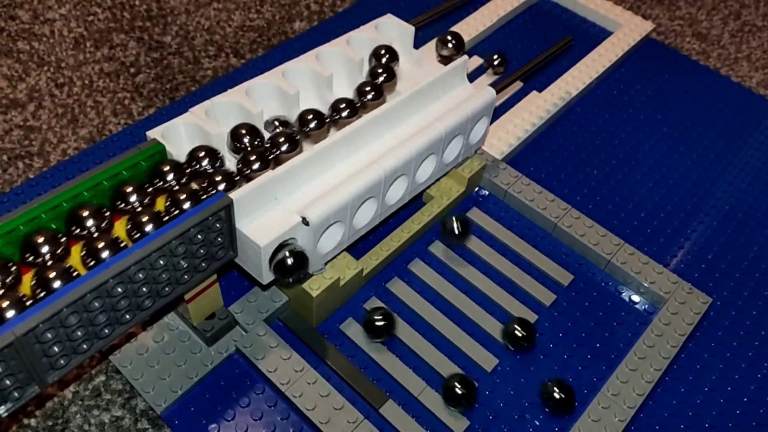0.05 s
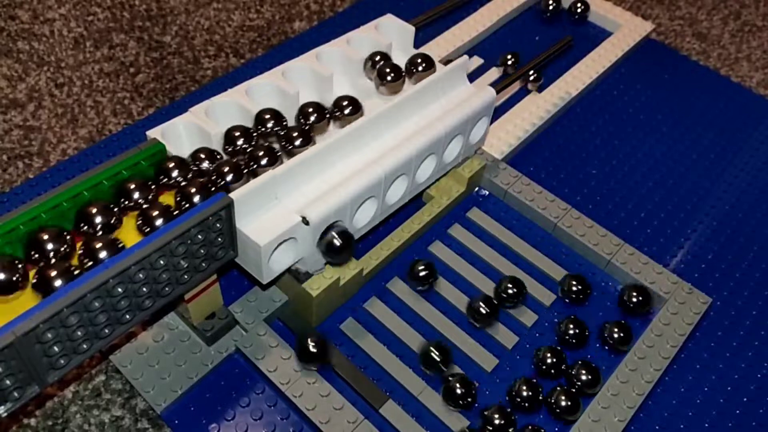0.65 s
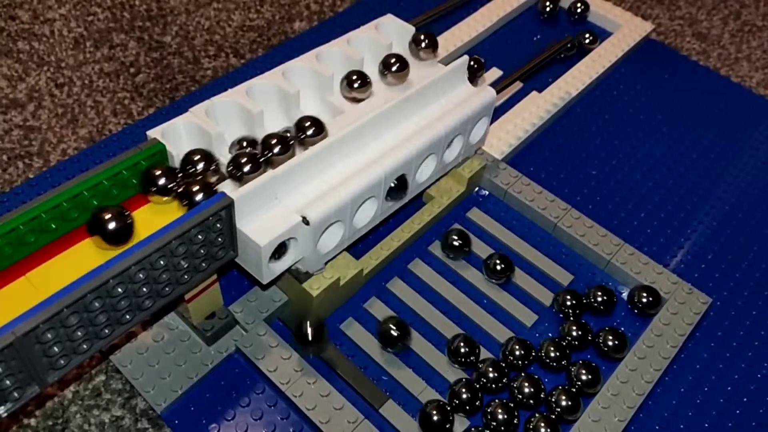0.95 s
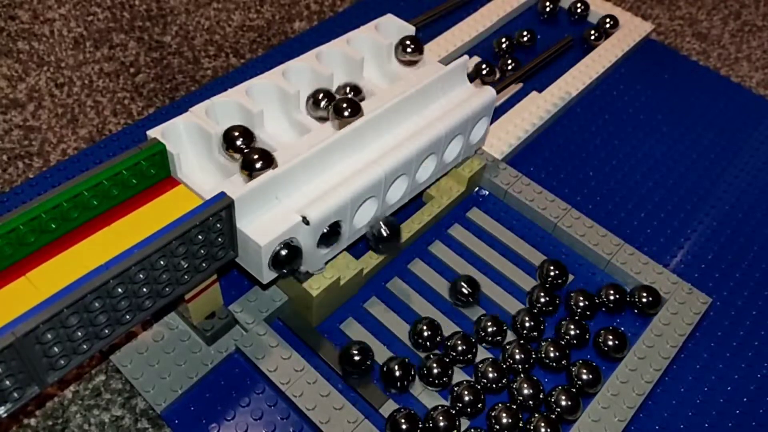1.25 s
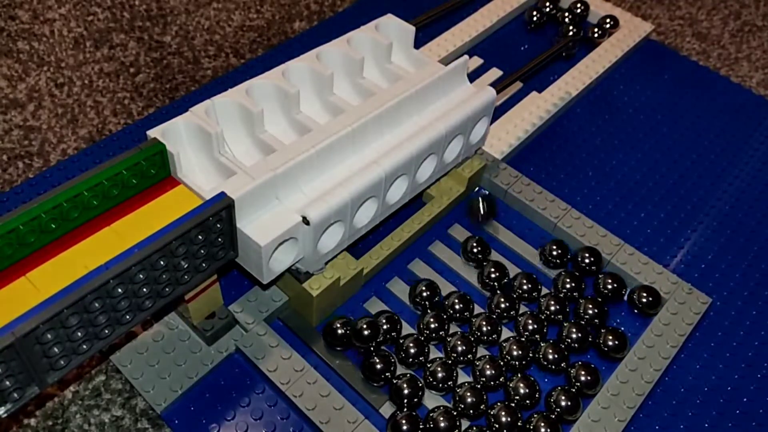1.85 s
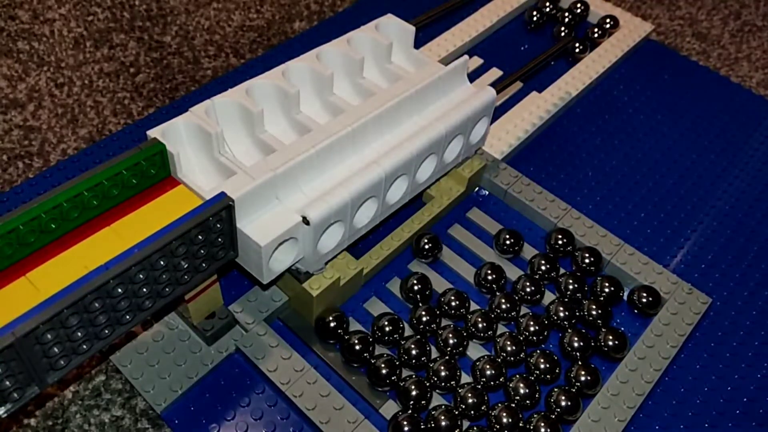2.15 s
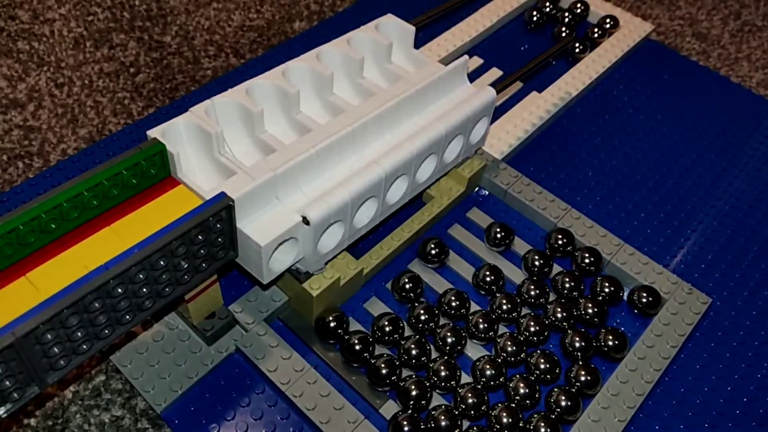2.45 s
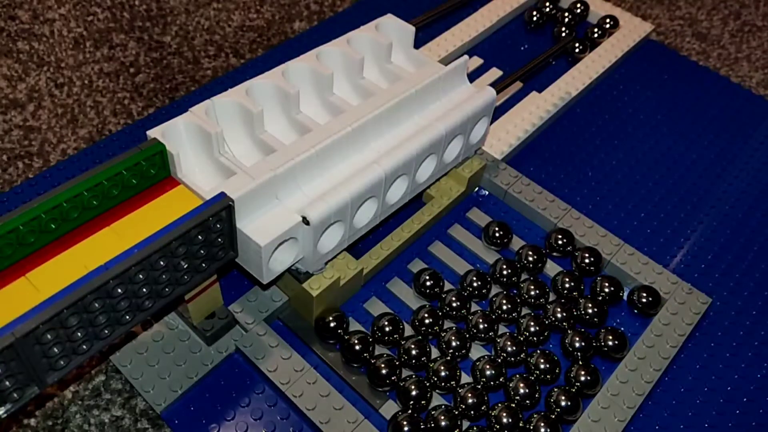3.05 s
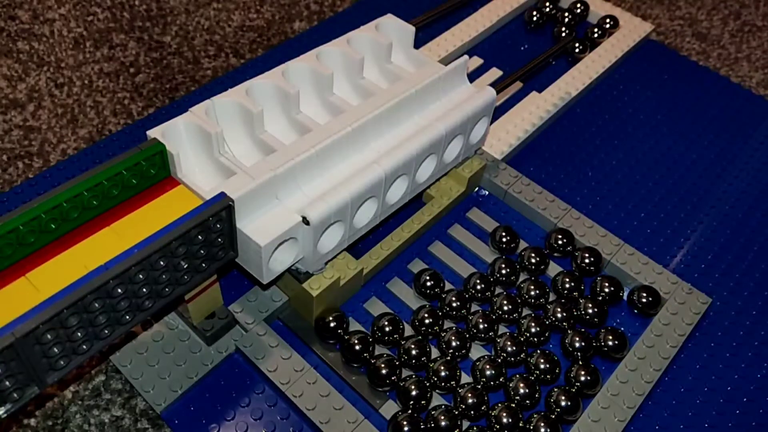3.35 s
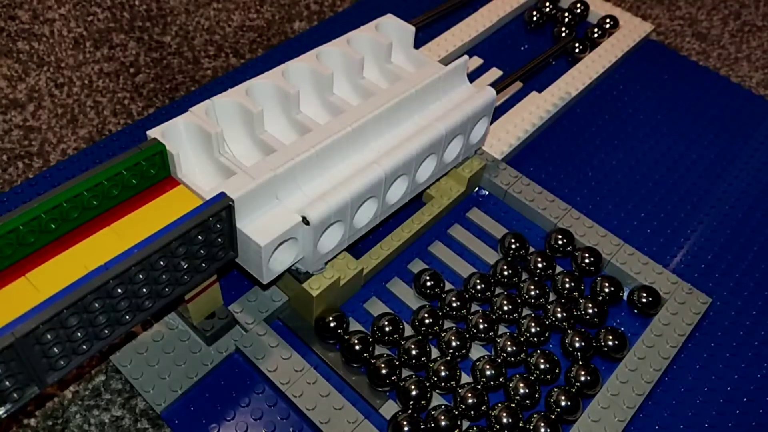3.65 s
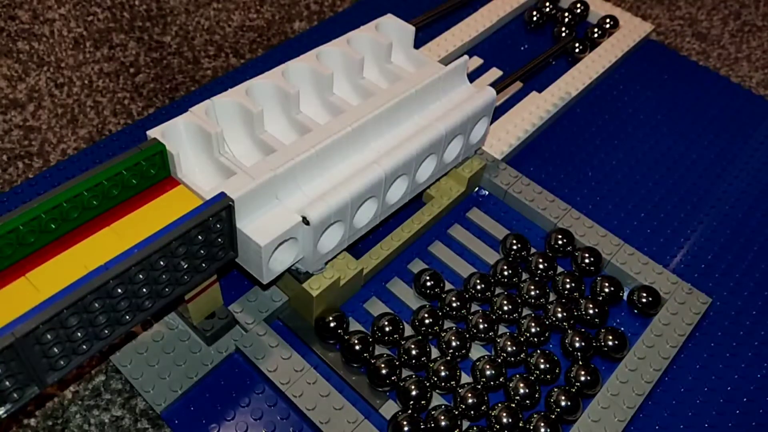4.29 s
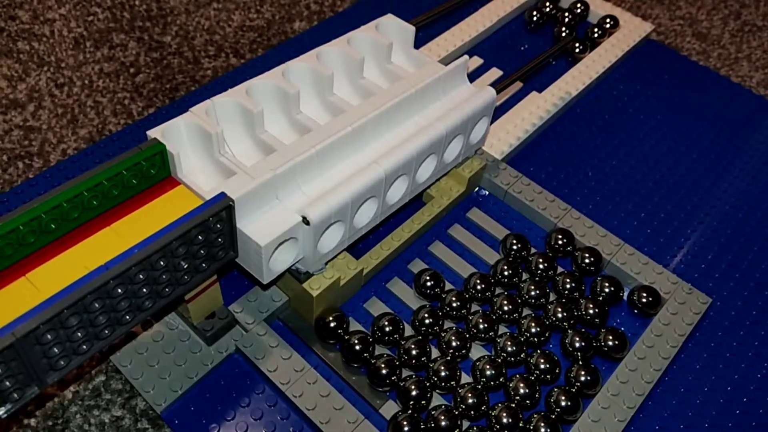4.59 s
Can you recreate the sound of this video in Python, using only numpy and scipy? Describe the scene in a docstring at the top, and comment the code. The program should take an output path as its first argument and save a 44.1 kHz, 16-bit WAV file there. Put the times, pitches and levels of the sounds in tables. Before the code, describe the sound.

From the very start, steel marbles pour through a plastic divider into a tray of toy bricks in a dense, fast clatter. Each landing gives a hollow knock, a sharp plastic clack and a bright metallic tick, with quick bounces and constant clicking between marbles over a slight low rumble. The stream thins at about 1.8 seconds and has died away by 2.3.

A straggler rolls softly with light clicks from about 2.5 seconds. Two marbles drop with distinct knocks and small bounces at 2.9 and 3.1 seconds. Faint clicks follow around 3.6, and at 3.7 one marble rocks to rest with a tiny, brief buzz. After a near-silent stretch, the sound cuts out for an instant just before 4.6 seconds, then a few faint taps close it. The microphone is close, in a quiet carpeted room with a very short echo.

```python
"""A clatter of steel marbles, pouring through a plastic divider into a tray of toy bricks.
Each drop thuds and cracks on the plastic, tings, bounces and stirs the other marbles, which click
together. After two seconds the stream thins out: stragglers roll, fall and nudge the heap, and one
rocks to rest with a tiny hum. The base plate and the carpeted room ring on briefly.
A phone close by hears it all; the sound drops out for a moment near the end."""
import sys
import numpy as np
from scipy import signal
from scipy.fft import rfft, irfft
from scipy.io import wavfile
from scipy.ndimage import uniform_filter1d

SR = 44100
rng = np.random.default_rng(int(sys.argv[2]) if len(sys.argv) > 2 else 0)


def store_wav(level_fs):
    """Save 16-bit WAV to argv[1]."""
    pcm = np.round(np.clip(np.atleast_2d(level_fs), -1, 1) * 32767)
    wavfile.write(sys.argv[1], SR, pcm.T.astype(np.int16))


N = 208345
RING = 8192  # samples in the sound of one blow
TIME, AGE = np.arange(N) / SR, np.arange(RING) / SR  # seconds into the scene, and into one blow
TOP_HZ = 14300  # the treble is cut above this
FULL_FLOW_DB = -25  # knocking level of a full stream


def amp(db):
    """Turn decibels into a gain to multiply by."""
    return 10 ** (np.asarray(db) / 20)


def fade(t60, age=AGE):
    """Die away by 60 dB every t60 seconds."""
    return np.exp(-np.log(1000) * age / t60)


def since(start_s):
    """Seconds since start_s, zero before it."""
    return np.maximum(TIME - start_s, 0)


def unit(x):
    """Scale to an average strength (rms) of 1."""
    return x / np.sqrt(np.mean(x ** 2))


def strike(x, size=88):
    """Scale a blow to an average strength of 1 over its first 2 ms."""
    return x / np.sqrt(np.mean(x[..., :size] ** 2))


def noise(spectrum, size, ripple_db=0, count=50):
    """Shaped stereo noise with optional random peaks and dips; low notes reach both microphones alike."""
    f = np.fft.rfftfreq(size, 1 / SR) + 1
    hz, db = np.transpose(spectrum)
    mid, side = rfft(rng.standard_normal((2, size)))
    alike = .85 / (1 + (f / 900) ** 2)
    pair = mid * np.sqrt(1 + alike) + np.array([[1], [-1]]) * side * np.sqrt(1 - alike)
    ripple_hz = np.linspace(0, SR / 2, count)
    ripple = np.array([np.interp(f, ripple_hz, r) for r in rng.standard_normal((2, count))])
    shape_db = np.interp(np.log(f), np.log(hz), db) + ripple_db * ripple
    return unit(irfft(pair * amp(shape_db), size))


def grain(depth_db, length, size=130):
    """Uneven contact: a gain that flutters at random, smoothed over size samples."""
    return unit(amp(depth_db * unit(uniform_filter1d(rng.standard_normal(length), size))))


def resonate(x, hz, width_hz, db):
    """Make a narrow band of pitches louder."""
    return x + (amp(db) - 1) * signal.lfilter(*signal.iirpeak(hz, hz / width_hz, fs=SR), x)


def cut_bass(x, hz):
    """Weaken everything below hz."""
    return signal.sosfilt(signal.butter(2, hz, "high", fs=SR, output="sos"), x)


def add(out, start_s, sound):
    """Mix one blow in at start_s."""
    i = int(np.clip(start_s * SR, 0, N - 1))
    out[:, i:i + RING] += sound[:, :N - i]


# The notes that the base plate and tray ring with: pitch_hz, ring_s, level_db
PLATE_NOTES = [(125, .12, -4), (162, .12, -4), (233, .06, -13), (305, .07, -4), (335, .08, -1),
               (400, .06, -5), (442, .07, -1), (510, .06, -1), (601, .07, 1), (680, .05, -2),
               (770, .05, -4), (870, .04, -5), (1020, .04, -7), (1900, .04, -8), (2020, .05, -9)]


def thud(spot_hz, stiff_hz=448, sag_hz=350, sag_db=-11.5, plate_db=-15.5, detune=0.011):
    """Plastic gives under a marble and springs back; a stiffer spot (higher spot_hz) sounds higher."""
    # the spot bends in two ways: the stiffer it is, the stronger the upper note
    low_hz = 450 * np.sqrt(spot_hz / stiff_hz)
    lower = np.sin(2 * np.pi * low_hz * AGE) * fade(0.014)
    upper = (spot_hz / 700) ** 2 * np.sin(2 * np.pi * 1.27 * low_hz * AGE) * fade(0.0057)
    # on soft spots the whole tray floor sags as well
    softness = min(1, 550 / spot_hz) ** 6
    sag = amp(sag_db) * softness * np.sin(2 * np.pi * sag_hz * AGE) * fade(0.029)
    dent = cut_bass(lower + upper + sag, 0.58 * spot_hz)  # air slips round small parts: no bass
    hz, ring_s, db = np.transpose(PLATE_NOTES)[:, :, None]
    share, lean, load = rng.standard_normal((3, len(PLATE_NOTES)))
    reach = np.minimum(1, (stiff_hz / spot_hz) ** 4 + (hz / spot_hz) ** 2)  # stiff spots: weak low notes
    loaded_hz = hz * (1 + detune * load[:, None])  # the heap's weight detunes the plate
    notes = reach * amp(db) * np.sin(2 * np.pi * loaded_hz * AGE) * fade(ring_s)
    plate = np.array([share + .25 * lean, share - .25 * lean]) @ notes
    return strike(cut_bass(amp(plate_db) * plate - strike(dent), hz=112))


# The tone of cracking plastic: pitch_hz, level_db
CRACK_TONE = [(300, -17), (950, 13.5), (1500, 4), (2200, 2), (4500, 0), (6500, -5.5), (9000, -15),
              (15000, -27)]


def crack(clack_hz, clack_db=-3.0, spread=0.07, slap_s=.0011, tail_db=-17, count=8):
    """A brick snaps with many high notes at once, then slaps its neighbour with a short, pitched clack."""
    snap = noise(CRACK_TONE, RING, ripple_db=4) * (fade(.014) + amp(tail_db) * fade(0.21))
    notes_hz = clack_hz * np.exp(spread * rng.standard_normal((count, 1)))
    clack = rng.standard_normal((2, count)) @ np.sin(2 * np.pi * notes_hz * AGE) * fade(.015)
    return strike(strike(snap) + amp(clack_db) * np.roll(strike(clack), int(slap_s * SR), axis=1))


# The tone of a struck steel marble: pitch_hz, level_db
TING_TONE = [(200, -30), (1000, -10.5), (3000, -9.5), (6000, -6.5), (8000, -3.5), (9500, 0), (11500, -4.5),
             (13000, -8.5), (15000, -18)]


def ting(spectrum, chatter_db, ripple_db):
    """Hard steel contact, brighter or duller each time; the neighbours chatter faintly after it."""
    chatter = amp(chatter_db) * fade(0.2) * grain(-1.5, RING)
    tilt_db_per_octave = 1.5 * rng.standard_normal()
    tone = [(hz, db + tilt_db_per_octave * np.log2(hz / TOP_HZ)) for hz, db in spectrum]
    return strike(noise(tone, RING, ripple_db) * (fade(.015) + chatter))


# Marbles landing on plastic: start_s, thud_db, spot_hz, clack_db, clack_hz, ting_db
DROPS = [(0.0015, -21.5, 720, -16.5, 1950, -13.5), (0.0449, -23.5, 640, -23, 2880, -33.5),
         (0.074, -25.5, 620, -25.5, 2400, -24), (0.1012, -15.5, 498, -16, 1970, -34.5),
         (0.1169, -14.5, 517, -27, 2280, -26), (0.177, -19.5, 590, -20, 1970, -19),
         (0.207, -22.5, 640, -36, 1980, -28), (0.263, -20.5, 690, -22, 2800, -11),
         (0.2697, -16, 440, -23, 2230, -18.5), (0.2751, -13.5, 467, -24, 3900, -9.5),
         (0.3572, -18.5, 666, -20, 1900, -18), (0.398, -21, 560, -25.5, 2240, -22.5),
         (0.4337, -21, 610, -23, 2060, -16.5), (0.4435, -19.5, 722, -20.5, 2000, -21),
         (0.5869, -15, 556, -18.5, 2020, -18), (0.6094, -13.5, 558, -26, 2030, -25),
         (0.6443, -17, 510, -32.5, 2220, -15), (0.6753, -17.5, 435, -30, 1930, -12),
         (0.7054, -19.5, 537, -29.5, 3200, -20), (0.7482, -19, 600, -27.5, 2600, -19),
         (0.7571, -23, 589, -32, 5500, -27), (0.787, -17, 530, -25, 3040, -12.5),
         (0.8641, -23.5, 700, -24, 2090, -22), (0.9085, -17.5, 662, -13, 2040, -14.5),
         (0.9362, -15, 466, -21, 3240, -14), (0.9645, -14, 553, -18.5, 2700, -16.5),
         (0.9959, -17, 760, -15, 2050, -15.5), (1.0348, -20, 620, -24.5, 2110, -26.5),
         (1.072, -10, 619, -14, 3230, -12.5), (1.0896, -13, 553, -25.5, 3035, -16.5),
         (1.1, -16.5, 639, -17.5, 1980, -13.5), (1.1606, -18, 600, -19, 1960, -15.5),
         (1.1693, -13, 480, -18.5, 3800, -18.5), (1.1755, -21, 600, -22.5, 2130, -17),
         (1.2126, -14.5, 490, -14.5, 2670, -11), (1.3066, -15, 671, -23, 1920, -14.5),
         (1.324, -13.5, 520, -18, 3180, -14.5), (1.378, -16.5, 520, -20, 3770, -17.5),
         (1.4607, -13.5, 588, -20, 5040, -15.5), (1.5371, -15.5, 590, -17, 1790, -12.5),
         (1.563, -13.5, 570, -20.5, 2460, -12.5), (1.6232, -19, 560, -21, 2320, -20),
         (1.64, -22.5, 632, -20, 2000, -14.5), (1.6883, -11, 520, -17.5, 5070, -10),
         (1.7104, -19, 550, -20, 3180, -19.5), (1.7862, -28, 698, -25.5, 3520, -18),
         (1.8366, -29.5, 680, -28.5, 2020, -20.5), (1.8797, -12, 530, -14.5, 3470, -12.5),
         (1.9842, -15, 594, -17.5, 4800, -16.5), (1.9865, -25.5, 650, -30, 5400, -15),
         (2.0176, -19.5, 570, -23.5, 4170, -20.5), (2.0508, -27.5, 736, -23.5, 4460, -18.5),
         (2.0768, -29, 690, -28.5, 3100, -44), (2.181, -35, 755, -30, 3670, -34),
         (2.9377, -20.5, 770, -23.5, 3400, -26), (3.0688, -17.5, 780, -19, 2760, -21.5),
         (4.6266, -41.5, 690, -36.5, 3050, -35), (4.6926, -41.5, 700, -29, 3070, -31.5),
         (4.707, -38.5, 360, -61, 5500, -58)]
# Free marbles bouncing again, with levels against the drop before: start_s, level_db
FREE_BOUNCES = [(1.7315, -14), (1.8934, -23), (1.921, -13.5), (2.0953, -8), (2.1164, -5), (2.9532, -15),
                (2.965, -14.5), (3.0875, -9.5), (3.094, -15), (3.107, -12)]


def drops(thud_gain_db=1.0, clack_gain_db=0.5, ting_gain_db=-3.5, rattle_db=-18, flight_ratio=.72):
    """Each marble lands with a thud, a crack of plastic and a ting of steel, then bounces close by."""
    out = np.zeros((2, N))
    next_starts = [row[0] for row in DROPS[1:]] + [np.inf]
    for (start_s, thud_db, spot_hz, clack_db, clack_hz, ting_db), next_s in zip(DROPS, next_starts):
        def hit(steel_db=0):
            plastic = amp(thud_db + thud_gain_db) * thud(spot_hz)
            plastic += amp(clack_db + clack_gain_db) * crack(clack_hz)
            steel = amp(ting_db + ting_gain_db) * ting(TING_TONE, chatter_db=-16.5, ripple_db=3.5)
            return plastic + amp(steel_db) * steel

        add(out, start_s, hit())
        # hemmed in by the crowd, the marble rattles: three hops, each shorter and softer
        rattle = amp(rattle_db) * np.sqrt(amp(stream(start_s)[0] - FULL_FLOW_DB))
        flight_s = .017 * np.exp(0.091 * rng.standard_normal())
        for k, late_s in enumerate(np.cumsum(flight_s * flight_ratio ** np.arange(3))):
            add(out, start_s + late_s, rattle * amp(-0.5 * k) * hit(steel_db=-8))
        for bounce_s, level_db in FREE_BOUNCES:
            if start_s < bounce_s < next_s:
                add(out, bounce_s, amp(level_db) * hit(steel_db=-8))
    return out


# How strongly the marbles stream down the chute: time_s, knocking_db, clicking_db
STREAM_LEVELS = [(0.0, -26.5, -22.5), (0.2, -25, -20), (0.34, -26.5, -29), (0.42, -24.5, -24),
                 (0.62, -20, -18), (0.85, -25, -26), (1.0, -23, -23), (1.43, -21.5, -24), (1.5, -23.5, -28),
                 (1.56, -21, -22), (1.85, -34, -34), (2.17, -31.5, -37), (2.25, -45.5, -50.5),
                 (2.361, -62.5, -55.5), (2.6, -78, -76)]


def stream(time_s):
    """The stream's knocking and clicking levels at time_s, in dB."""
    times, *columns = np.transpose(STREAM_LEVELS)
    return [np.interp(time_s, times, levels) for levels in columns]


def jostling(stir_db=-18.5, stir_t60=0.17):
    """Gains of the crowd's knocking and clicking: both follow the stream and flare up after each drop."""
    knocking_db, clicking_db = stream(TIME)
    blows = np.zeros(N)
    for start_s, thud_db, *_ in DROPS:
        blows[int(start_s * SR)] = amp(thud_db + stir_db) ** 2
    stir = np.sqrt(np.abs(signal.fftconvolve(blows, fade(stir_t60) ** 2)[:N]))
    stir *= amp(0.45 * (knocking_db - FULL_FLOW_DB))  # a thin stream has less to stir
    return np.hypot(amp(knocking_db), stir), np.hypot(amp(clicking_db), stir)


def shower(blows, gain, per_second, scatter_db):
    """Loosely spaced blows of random strength; together they are as loud as the gain curve asks."""
    out = np.zeros((2, N))
    count = int(per_second * STREAM_LEVELS[-1][0])
    late, strength = rng.uniform(-1, 1, (count, 2)).T
    starts = np.abs(np.arange(count) + 2 * late) / per_second
    blow_energy = np.mean(np.sum(np.square(blows), axis=-1))
    size = unit(amp(scatter_db * strength)) * np.sqrt(SR / per_second / blow_energy)
    for k, start_s in enumerate(starts):
        add(out, start_s, size[k] * gain[int(start_s * SR)] * blows[k % len(blows)])
    return out


# The tone of the base plate rumbling under the crowd: pitch_hz, level_db
BASE_TONE = [(40, -27.5), (80, -23.5), (125, -4), (160, 3), (215, -22), (1000, -58.5)]


def pour(knock_db=-3.0, click_db=-7.0, base_db=-18.0, spot_hz=555, clack_hz=2500):
    """The crowd jostles down the chute: small knocks on plastic, clicks of steel and a low rumble."""
    knocking, clicking = jostling()
    spots = rng.standard_normal((90, 3))
    bumps = [thud(spot_hz * 2 ** (0.6 * low)) + amp(-0.5) * crack(clack_hz * 2 ** (.4 * high))
             for low, high, _ in spots]
    ticks = [amp([[pan_db], [-pan_db]]) * ting(TING_TONE, chatter_db=-8.5, ripple_db=7.0)
             for pan_db in 1.7 * spots[:, 2]]
    return (shower(bumps, knocking * amp(knock_db), per_second=230, scatter_db=3.0)
            + shower(ticks, clicking * amp(click_db), per_second=300, scatter_db=6.0)
            + amp(base_db) * knocking * noise(BASE_TONE, N))


# The tone of steel against steel: pitch_hz, level_db
CLINK_TONE = [(200, -28.5), (1000, -15), (3000, -9.5), (6000, -9.5), (8000, -3), (10000, -1), (12000, -8.5),
              (15000, -23.5)]
# Marbles hitting each other: start_s, level_db, left_minus_right_db
MARBLE_CLICKS = [(0.018, -23.5, -21), (0.0837, -23, -15), (0.3976, -14, 2), (0.411, -14.5, 7),
                 (0.51, -17.5, 1), (0.667, -17.5, -9), (0.7096, -13.5, 16), (0.7193, -10.5, 7),
                 (0.8869, -15.5, -5), (0.89, -11.5, 13), (0.954, -17, 5), (1.0665, -22, -1),
                 (1.3003, -11, 2), (1.3977, -12, -10), (1.401, -14, 5), (1.425, -14.5, 1), (1.517, -17, 0),
                 (1.526, -21, 9), (1.706, -14.5, -1), (1.774, -22.5, 6), (1.894, -17.5, 8), (1.91, -19, -3),
                 (1.9893, -15.5, -12), (2.038, -16.5, -1), (2.1718, -27.5, 0), (2.2683, -33.5, -1),
                 (2.4274, -41.5, 4), (2.511, -41, -2), (2.723, -47.5, -7), (2.8077, -30, 1),
                 (2.8217, -33.5, 4), (2.9946, -29.5, -2), (3.154, -34, -4), (3.567, -42, -3),
                 (3.607, -51, 0), (3.723, -47, 5), (3.727, -41.5, -1), (3.8317, -48.5, -1)]


def clicks(gain_db=-3.5, plastic_db=-19):
    """Two marbles meet with a short, dry clink; a little of the blow passes into the plastic below."""
    out = np.zeros((2, N))
    for start_s, level_db, pan_db in MARBLE_CLICKS:
        steel = ting(CLINK_TONE, chatter_db=-19.5, ripple_db=4.0)
        blow = amp([[pan_db / 2], [-pan_db / 2]]) * steel + amp(plastic_db) * thud(spot_hz=520)
        add(out, start_s, amp(level_db + gain_db) * blow)
    return out


# The tone of the soft rumble: pitch_hz, level_db
RUMBLE_TONE = [(60, -19), (160, 5.5), (240, -2), (350, 5.5), (550, 5), (1000, -1), (1600, -8), (3000, -4.5),
               (6000, -48), (15000, -43)]
# Short swells of rumble and hiss: start_s, length_s, rumble_db, hiss_db
# The row at 3.062 s is a brief, bright hiss just before and around the knock at 3.07 s.
# The others are single marbles, rumbling over the plastic and hissing on its fine bumps.
SWELLS = [(2.498, 0.32, -77, -64.5), (2.716, 0.39, -62.5, -53.5), (2.813, 0.01, -46.5, -50.5),
          (2.911, 0.069, -45, -52.5), (3.062, 0.03, -58, -41), (3.119, 0.24, -75, -55),
          (4.598, 0.12, -56, -62)]


def rumble_and_hiss(rumble_gain_db=-1, hiss_gain_db=-4.5, rise_s=0.0051, stop_t60=0.096):
    """A fluttering rumble and hiss swell up, hold and die away."""
    rumble, hiss = np.zeros((2, N))
    for start_s, length_s, rumble_db, hiss_db in SWELLS:
        swell = np.minimum(since(start_s) / rise_s, 1) * fade(stop_t60, since(start_s + length_s))
        rumble += amp(rumble_db + rumble_gain_db) * swell
        hiss += amp(hiss_db + hiss_gain_db) * swell
    flutter = grain(2.0, N) * grain(2.0, N, size=1500)
    return flutter * (rumble * noise(RUMBLE_TONE, N) + hiss * noise(CLINK_TONE, N))


def settling(start_s=3.725, rise_s=0.015, ticks_per_s=504, hum_db=-52.5, tick_db=-51):
    """A marble rocks to rest between two tiles, so fast that its ticks merge into a short, rough hum."""
    rocking = np.minimum(since(start_s) / rise_s, 1) * fade(0.073, since(start_s + rise_s))
    cycle = np.cumsum(ticks_per_s * grain(1.4, N) / SR) % 1
    push = unit(np.exp(-cycle / 0.27))  # one sharp push at each contact
    hum_band = signal.butter(1, [ticks_per_s / 2, ticks_per_s], "band", fs=SR, output="sos")
    hum = unit(signal.sosfilt(hum_band, push))
    ticks = resonate(push * noise(CLINK_TONE, N), hz=3050, width_hz=600, db=10)  # the tile rings along
    return rocking * (amp(hum_db) * hum + amp(tick_db) * ticks)


def room(dry, echo_db=-9, t60=0.13, build_s=0.0011):
    """The base plate, furniture and carpeted room add a short, blurred echo."""
    echo = noise([(50, -2.0), (3000, 6.5), (15000, 0.5)], RING) * fade(t60)
    echo *= 1 - np.exp(-AGE / build_s)
    echo /= np.sqrt(np.sum(echo ** 2) / 2)
    return dry + amp(echo_db) * signal.fftconvolve(dry, echo, axes=1)[:, :N]


# The tone of the room's quiet background: pitch_hz, level_db
BACKGROUND_TONE = [(20, 6), (60, -8), (120, -12.5), (250, -18.5), (600, -23.5), (1500, -29), (4000, -30),
                   (9000, -36), (15000, -35)]


def scene(background_db=-57):
    """All the sounds in the room, over its quiet background."""
    sounds = drops() + clicks() + pour() + rumble_and_hiss() + settling()
    return room(sounds) + amp(background_db) * noise(BACKGROUND_TONE, N)


# Two ringing bands for each microphone opening, left then right: pitch_hz, width_hz, lift_db
MIC_RINGS = [
    [(11070, 860, 8.5), (13500, 1200, 2)],
    [(8795, 1100, 10.5), (7310, 1600, 2.5)],
]


def record(dry, dropout_from_s=4.559, dropout_to_s=4.614, ceiling=.85):
    """The microphone openings ring; the sound drops out briefly; peaks are rounded, top treble is cut."""
    heard = np.array([resonate(resonate(x, *main), *minor) for x, (main, minor) in zip(dry, MIC_RINGS)])
    live = (TIME < dropout_from_s) | (TIME > dropout_to_s)
    rounded = ceiling * np.tanh(heard * live / ceiling)
    return signal.sosfilt(signal.ellip(8, .2, 70, TOP_HZ, fs=SR, output="sos"), rounded)


dry = scene()
out = record(dry)
store_wav(out)
```